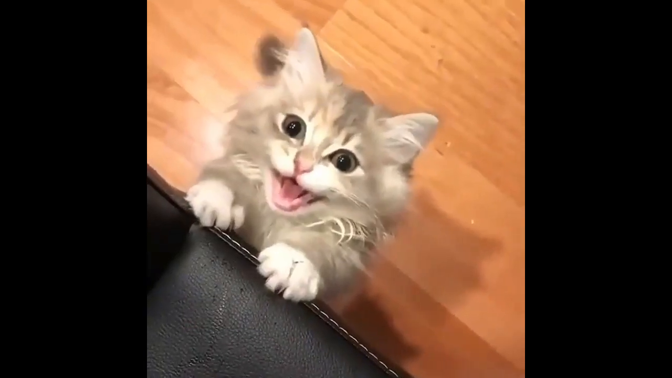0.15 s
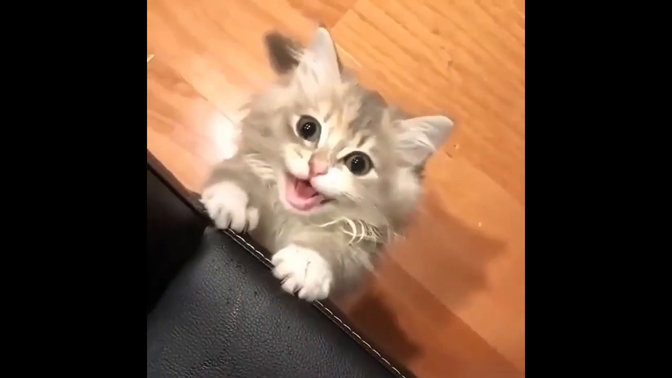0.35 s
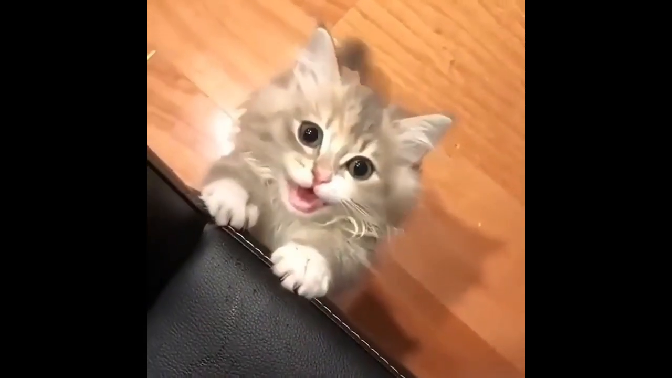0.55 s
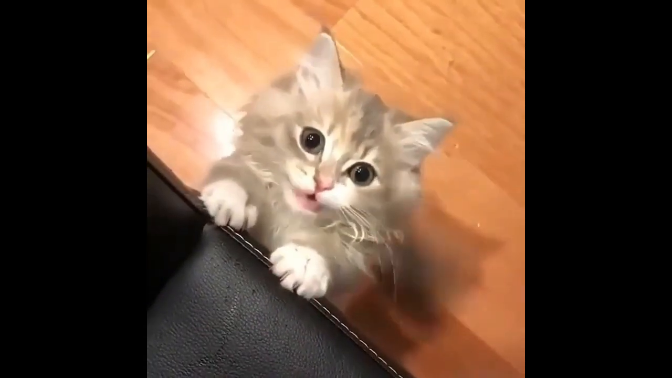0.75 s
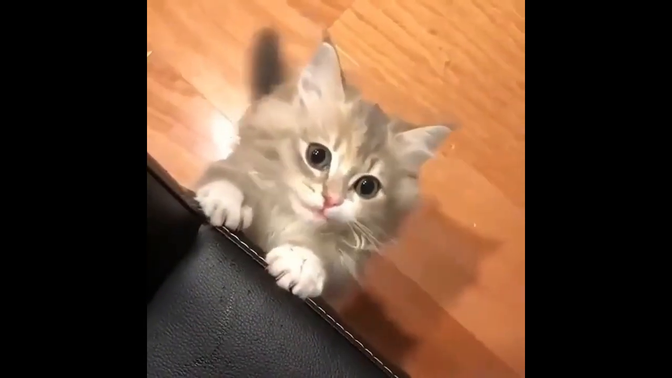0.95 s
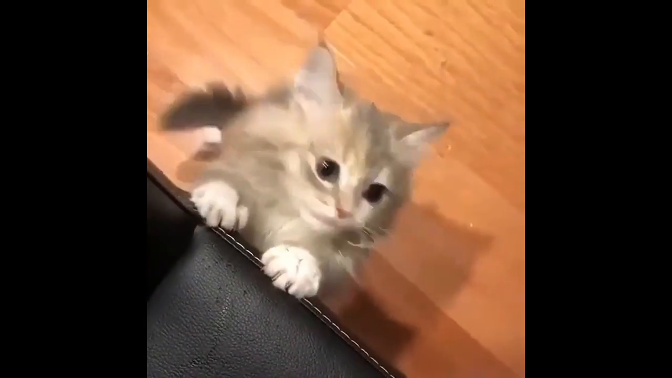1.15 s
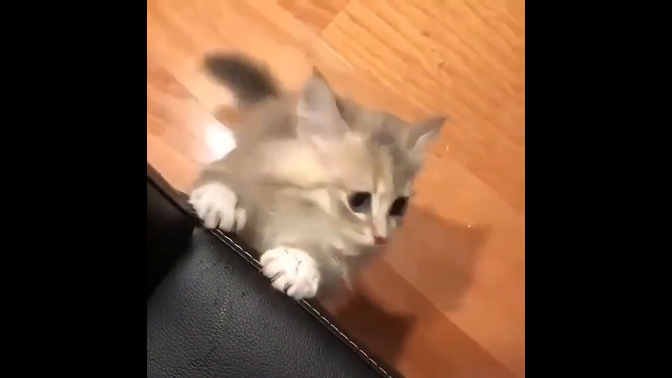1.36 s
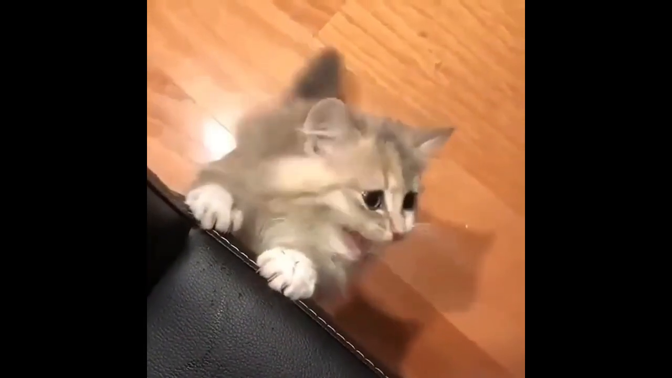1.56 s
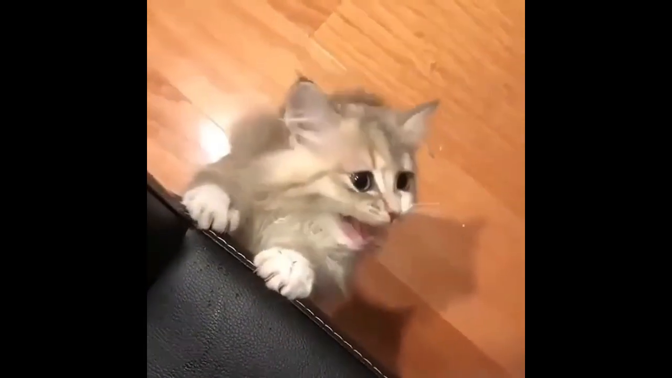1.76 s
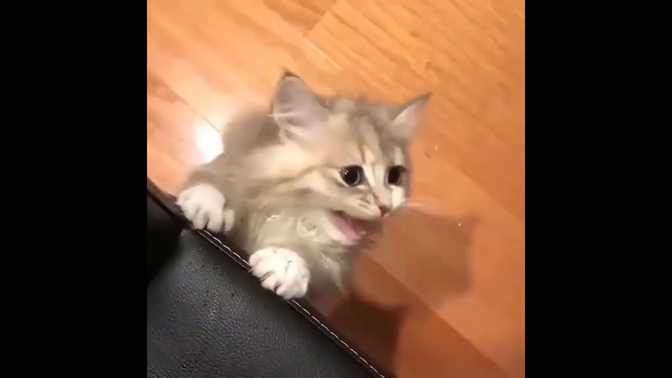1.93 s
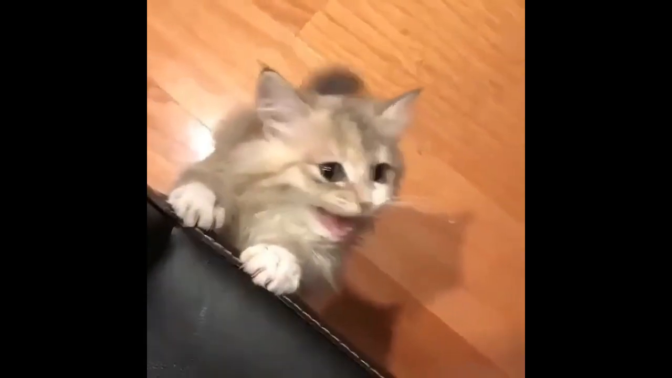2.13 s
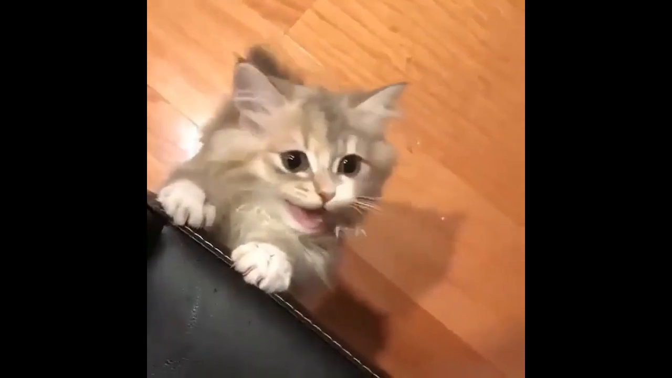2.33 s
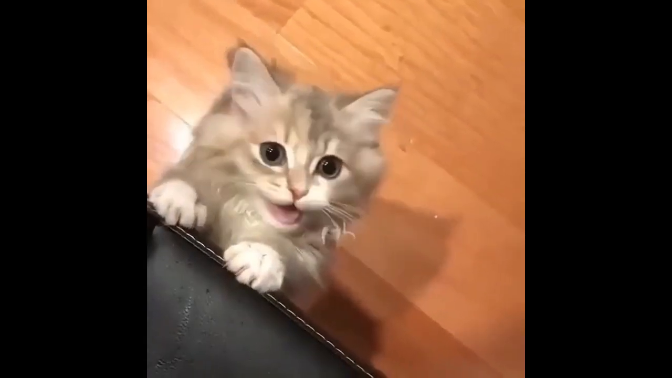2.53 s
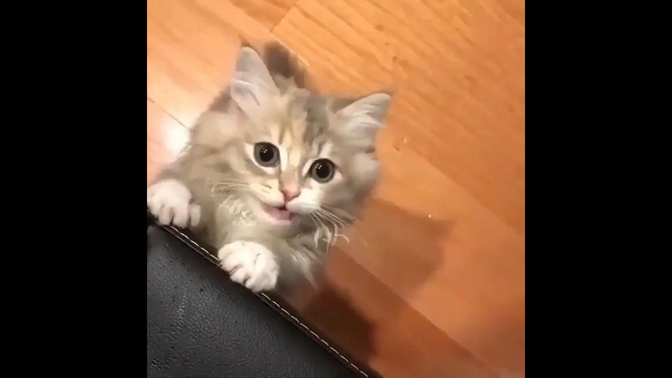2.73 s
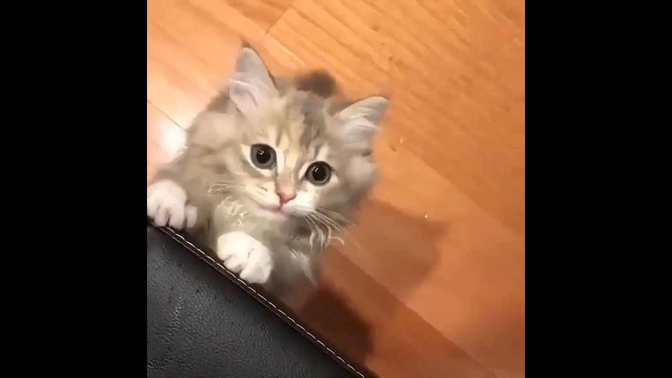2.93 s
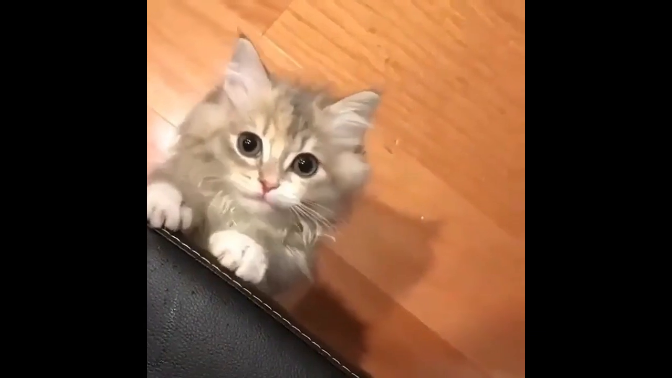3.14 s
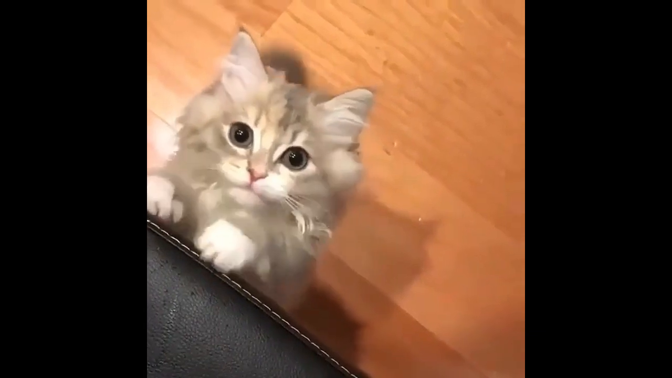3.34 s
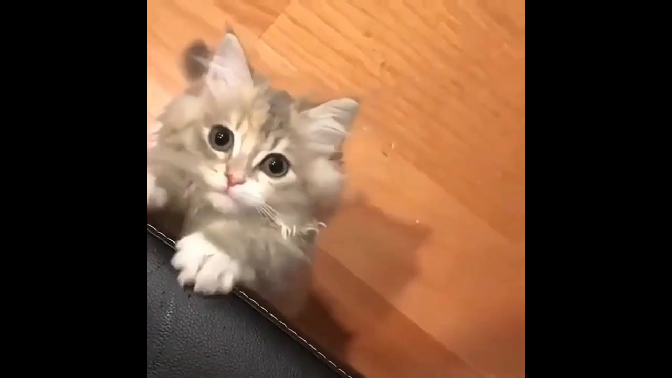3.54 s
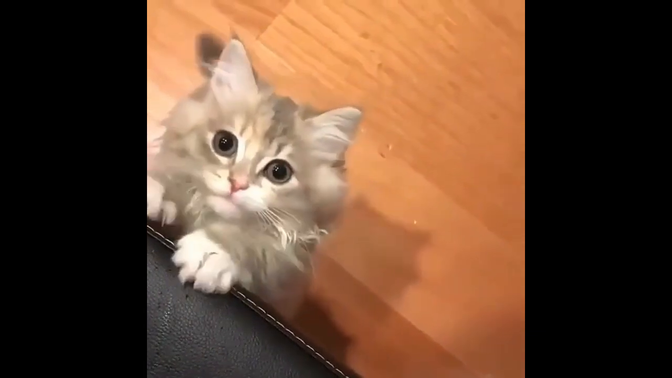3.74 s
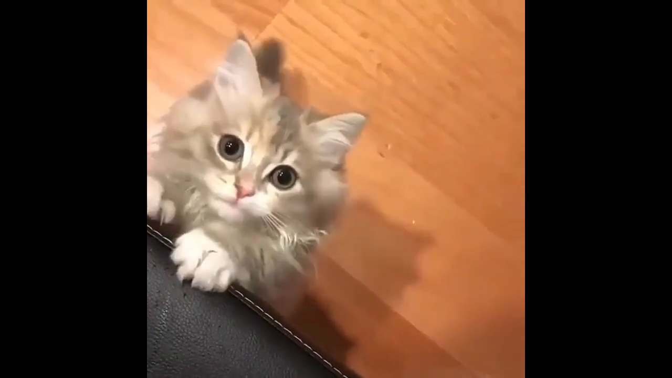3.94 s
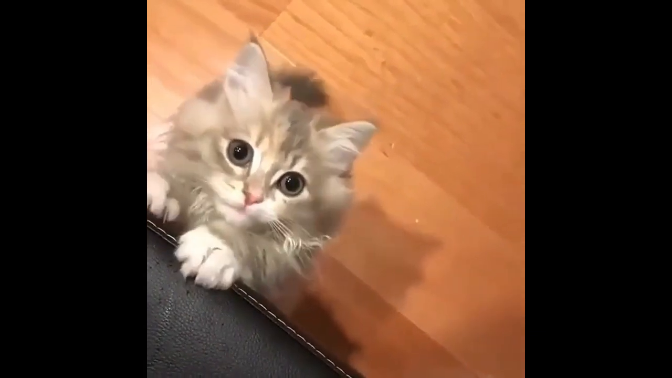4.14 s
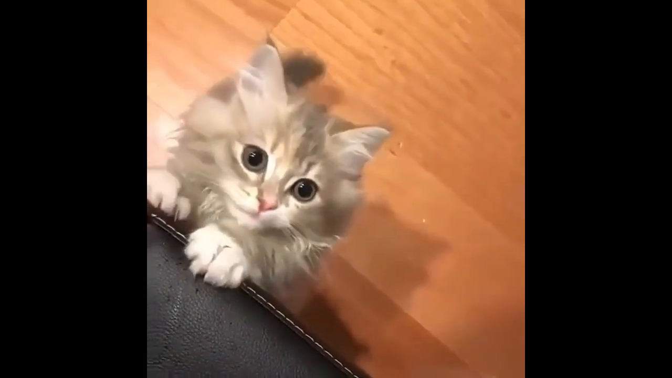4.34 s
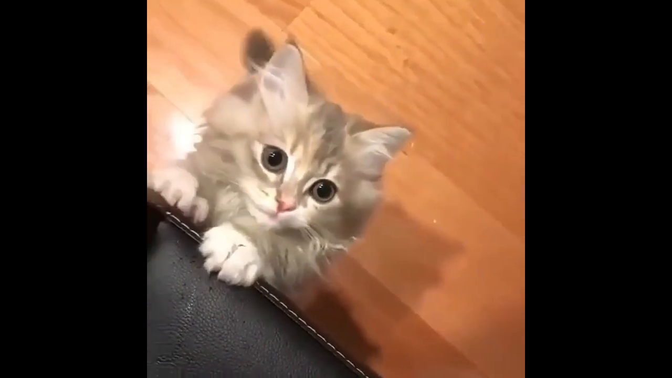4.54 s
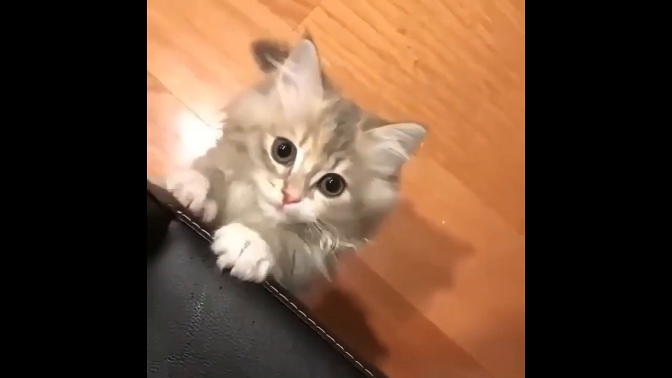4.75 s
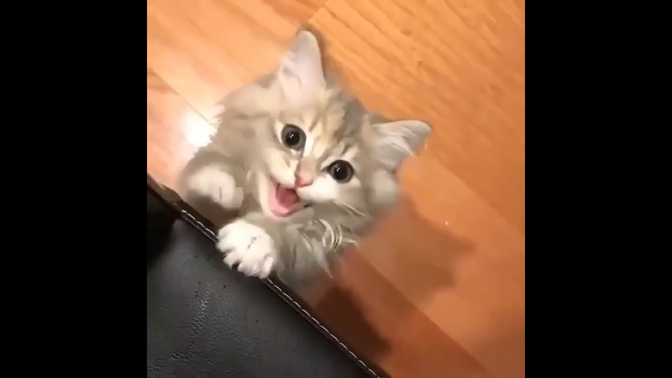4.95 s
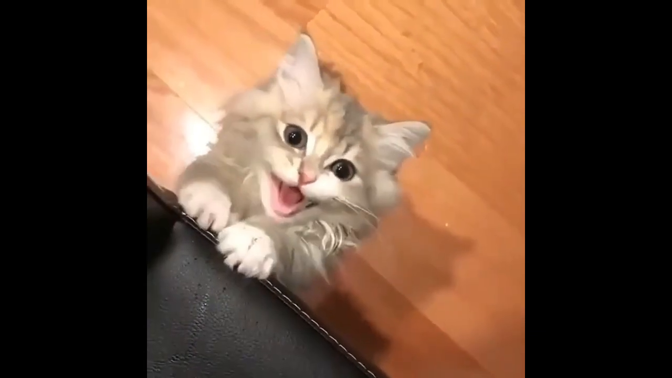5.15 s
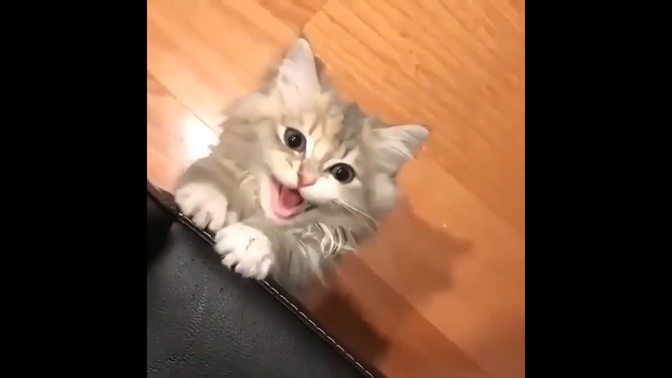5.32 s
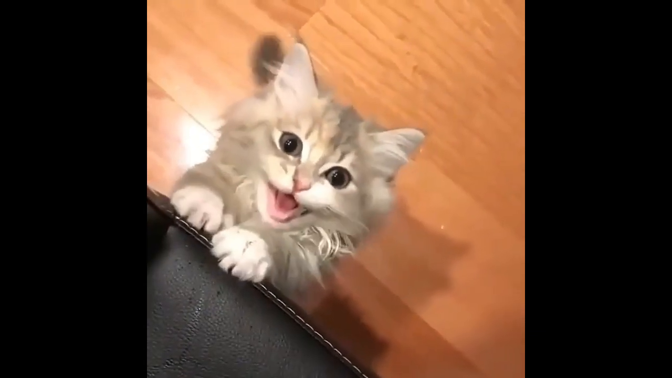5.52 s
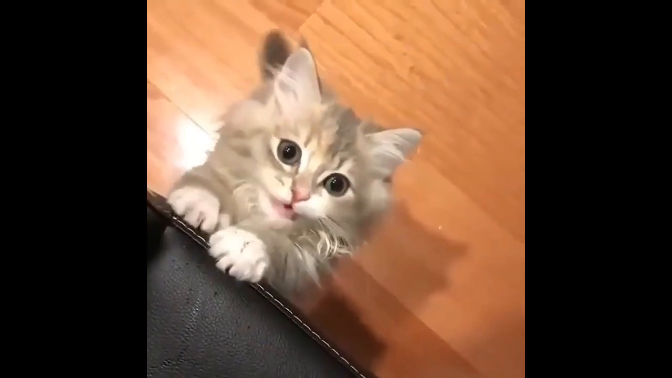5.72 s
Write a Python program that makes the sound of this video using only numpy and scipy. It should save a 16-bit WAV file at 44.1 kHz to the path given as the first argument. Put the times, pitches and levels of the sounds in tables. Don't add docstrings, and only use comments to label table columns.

```python
import sys
import numpy as np
from scipy import signal
from scipy.fft import rfft, irfft, next_fast_len
from scipy.io import wavfile
from scipy.ndimage import uniform_filter1d, minimum_filter1d

SR = 44100
rng = np.random.default_rng(int(sys.argv[2]) if len(sys.argv) > 2 else 0)


def nominal_scale(level):
    x = np.asarray(level, float) / 20
    return 10 ** x


def persist_wave(psi):
    counts = np.round(np.clip(psi, -1, 1) * 32767).astype(np.int16)
    wavfile.write(sys.argv[1], SR, np.atleast_2d(counts).T)


N = 259308

# t/s, f/Hz
MEW_PITCHES = [
    [(0.0, 807), (0.02, 798), (0.146, 783), (0.42, 763), (0.515, 737.3), (0.612, 676), (0.704, 703),
     (0.785, 715)],
    [(1.548, 789), (1.63, 763), (1.85, 768.7), (1.882, 787), (2.078, 792.3), (2.2, 775), (2.44, 761.3),
     (2.52, 745), (2.618, 678)],
    [(4.964, 818), (5.068, 734), (5.098, 733), (5.168, 751), (5.326, 780), (5.442, 788.4), (5.622, 771),
     (5.698, 748.5), (5.77, 674)],
]
# t/s, effort level/dB, mouth f/Hz, mouth focus above effort level/dB,
# nose facing the microphone level/dB
FIRST_MEW = [(0.0, -41.5, 3013, 12.5, -4.5), (0.32, -39, 3080, 0, -5.5), (0.524, -43, 2736, 8.5, -5.5),
             (0.552, -49.5, 2724, 17, -1), (0.582, -55, 2890, 14, -4), (0.622, -60, 2930, 22, 4),
             (0.68, -52, 2976, 22, -2), (0.734, -49.5, 2917, 17, -4.5), (0.785, -51.5, 2870, 5, -4.5)]
# t/s, effort level/dB, mouth f/Hz, mouth focus level/dB, nose facing level/dB
SECOND_MEW = [(1.509, -35.5, 3040, -28, -19.5), (1.65, -42, 2800, 4.5, -16), (1.8, -43, 3030, 8.5, -12),
              (2.106, -41, 3150, 3.5, -12), (2.16, -44.5, 3190, -2, -9), (2.42, -45.5, 2830, 6.5, -5.5),
              (2.522, -44.5, 2560, 11.5, -7), (2.58, -58.5, 2910, 4.5, -0.5), (2.773, -59, 2890, 10.5, 1.5)]
# t/s, effort level/dB, mouth f/Hz, mouth focus level/dB, nose facing level/dB
THIRD_MEW = [(4.928, -29.5, 3020, -5, -9), (5.01, -32, 3100, -7.5, -8), (5.11, -38, 2810, -5, -12.5),
             (5.184, -37.5, 3050, 5, -9), (5.292, -41.5, 3246, 16, -13), (5.306, -41.5, 3118, 8, -5.5),
             (5.64, -41, 2910, 7.5, -6), (5.688, -47.5, 2685, 16, -3.5), (5.77, -62.5, 1907, 20, 7)]
# start level/dB, end level/dB, second partial above it level/dB,
# third partial at start level/dB, at end level/dB
MEW_THROATS = [(-49, -50.5, -4.5, -1.5, -36.5), (-57, -48.5, -4, -20, -8.5), (-50.5, -51, -7.5, -5.5, -10)]
# breath against voice at start level/dB, at end level/dB,
# palate tilt per partial at start level/dB, at end level/dB
MEW_AIRFLOWS = [(-24, -35.5, -2, -3.4), (-26, -22.5, 1.2, -2.4), (-23, -21, -2, -2)]
# cheek level/dB, sinus level/dB, nose breath level/dB, pitch jitter/ratio
MEW_HEADS = [(-27, -10, 0, 0.0034), (1, -13.5, -5.5, 0.00263), (-34, -23, 1, 0.0039)]
# f/Hz, width/Hz
TRACT_MODES = [
    (760, 233),
    (3000, 395),
    (4156, 2350),
    (9110, 1960),
    (7010, 260),
    (13400, 2800),
]
# t/s, rise f/Hz, half width/s
FOLD_WOBBLES = [(0.173, 6.1, 0.087), (1.684, 12.9, 0.0209), (2.27, 12.2, 0.0346), (2.399, 8.2, 0.0405),
                (5.16, 4, 0.023)]
# t/s, depth level/dB, half width/s
VOICE_CATCHES = [(.575, 3, 0.0044), (1.545, 5.5, 0.0025), (1.863, 3, 0.004), (1.887, 8, 0.003),
                 (5.303, -0.5, 0.002), (5.316, 1, 0.0018), (5.330, 14, 0.0015), (5.349, 10, 0.00077),
                 (5.377, 6, 0.0026), (5.407, 1, 0.0031), (5.432, 2, 0.0015), (5.47, -4, 0.0017),
                 (5.505, 7, 0.0014), (5.554, 9, 0.0011)]
# t/s, length/s, depth/0-1
WEAK_PULSES = [(1.62, 0.13, 0.22), (4.966, 0.04, 0.07), (5.035, 0.099, 0.14), (5.36, 0.12, 0.14)]
# t/s, length/s, level/dB, slips per second/Hz, croak of the closing mouth level/dB
FOLD_RASPS = [(.764, .056, -51, 960, 1.5), (1.5, 0.045, -54, 1400, 0), (1.57, 0.17, -50, 1600, -25),
              (1.72, .2, -53, 1900, -22), (2.55, .07, -62, 1500, -20), (2.766, 0.04, -58, 630, 8),
              (4.926, 0.038, -44, 580, -15), (4.95, 0.11, -44.5, 1500., -21), (5.29, .45, -53, 1500, -25),
              (5.762, 0.037, -58.5, 1500, 6.5)]
# f/Hz, width/Hz, level/dB
BREATH_MODES = [(700, 1300, -16), (1590, 330, -6.5), (2980, 600, 6.5), (3810, 380, 1), (4480, 590, -1.5)]
# f/Hz, width/Hz, level/dB
NOSE_BREATH_MODES = [(9660, 3500, -4), (13200, 2100, -12.5)]
# f/Hz, width/Hz, share of power taken away/0-1
THINNER_BANDS = [(1950, 350, .9), (5750, 850, .8), (7800, 400, .7), (12250, 1900, .75)]
# (the thump fades by 60 dB
PAW_KNOCKS = [(0.391, -45, 405, -30, 0.039), (2.24, -39.5, 1110, -25, 0.011),
              (2.278, -37.5, 507, -30, 0.026), (2.45, -45, 192, -40, 0.081), (2.531, -49, 230, -40, 0.072),
              (2.822, -46.5, 228, -27, 0.035), (2.854, -53, 203, -36, 0.032),
              (2.963, -42.5, 324, -38, 0.029), (2.968, -46.5, 580, -12, 0.022),
              (3.385, -32.5, 370, -10, 0.026), (3.404, -42, 610, -19, 0.052),
              (3.419, -48.5, 450, -22, 0.093), (3.644, -46, 353, -17, 0.04), (3.662, -44, 260, -19, 0.029),
              (3.74, -38, 400, -23, 0.025), (3.746, -48, 536, -16, 0.061), (3.758, -44.5, 252, -33, 0.034),
              (4.771, -43.5, 460, -18, 0.037), (5.014, -31.5, 520, -31, 0.012)]
# delay t/s, level/dB
ROOM_ECHOES = [(.0021, -35), (.0047, -57), (.0083, -32), (0.0128, -16.5)]
# f/Hz, density level/dB
FAN_SPECTRUM = [(15, -63), (25, -15), (54, -9), (86, 2), (112, -3), (135, -12), (166, -1), (234, -9.5),
                (357, -7.5), (464, -28.5), (503, -12), (766, -16.5), (997, -15.5), (2780, -28.5),
                (13500, -43)]
# f/Hz, width/Hz, rms level/dB
APPLIANCE_HUMS = [(106.4, 14, -68.5), (169.84, 12, -66.5), (365.7, 8.2, -73)]
# t/s, mask rise level/dB
THIN_MOMENTS = [(1.14, 9), (3.36, 5.5), (3.635, 5), (3.722, 7), (3.766, 6.5), (4.79, 11), (4.916, -9),
                (5.28, 10), (5.48, 24), (5.8, -3)]


def kitten():
    tremor, shimmer = drift(55.6)[0], drift(20.3, count=7)
    air = rng.standard_normal(N) * nominal_scale(1.5 * drift(14)[0])
    hiss = np.array([windpipe(air, BREATH_MODES), windpipe(air, NOSE_BREATH_MODES)])
    scale = np.std(hiss[0])
    sound = fold_rasps() / scale
    mouths = (FIRST_MEW, SECOND_MEW, THIRD_MEW)
    for call in zip(MEW_PITCHES, mouths, MEW_THROATS, MEW_AIRFLOWS, MEW_HEADS):
        sound = sound + mew(*call, tremor, shimmer, hiss / scale)
    return thin_bands(sound)


def mew(tune, rows, throat, airflow, head, tremor, shimmer, hiss):
    s, *columns = np.transpose(rows)
    span = slice(round(s[0] * SR), min(round(s[-1] * SR), N))
    t = np.arange(N)[span] / SR
    slow = t[::32]
    begins = s[0] > 0

    def glide(ends):
        return np.interp(slow, s[[0, -1]], ends)

    effort_db, mouth_hz, focus_db, facing_db = [np.interp(slow, s, c) for c in columns]
    weak_db = begins * 4.5 * np.clip(1 - (slow - s[0]) / 0.023, 0, 1)
    palate_db = effort_db - weak_db
    mouth_db, nose_db = palate_db + focus_db, palate_db + facing_db

    narrow_db = begins * 10.5 * bell(slow, s[0] + 0.051, 0.027)
    palate_db = palate_db + 0.22 * narrow_db
    start_db, end_db, second_db, *third = throat
    second_db = second_db + narrow_db - 0.28 * np.maximum(focus_db, 0)
    third_db = glide(third) - 2 * narrow_db
    sag_s = 0.12
    closing = np.clip(1 - (s[-1] - slow) / sag_s, 0, 1) ** 2
    throat_db = glide([start_db, end_db]) - .5 * weak_db - 3.5 * closing
    breath_db, tilt_db = glide(airflow[:2]), glide(airflow[2:])

    scoop_hz = begins * 115.5 * np.clip(1 - (t - s[0]) / .042, 0, 1) ** 2
    sag_hz = 65.8 * np.clip(1 - (s[-1] - t) / sag_s, 0, 1) ** 2
    wobble_hz = sum(hz * bell(t, at, width) for at, hz, width in FOLD_WOBBLES)
    pitch = np.interp(t, *np.transpose(tune)) - scoop_hz - sag_hz + wobble_hz
    pitch = uniform_filter1d(pitch, size=400)
    cheek_db, sinus_db, nose_breath_db, jitter = head
    catch_db = sum(db * bell(t, at, width) for at, db, width in VOICE_CATCHES)
    bend = 1 + jitter * tremor[span] - .001 * catch_db
    phase = 2 * np.pi * np.cumsum(pitch * bend) / SR

    (_, throat_w), (_, mouth_w), (palate_hz, palate_w), nose, cheek, sinus = TRACT_MODES
    low, voice = pitch[::32], 0
    palate_top = hump(5 * low, palate_hz, palate_w, steep=2.26)
    for k in range(1, 22):
        hz = k * low
        if k < 4:
            power = nominal_scale(2 * (throat_db + (0, second_db, third_db)[k - 1]))
        else:
            power = nominal_scale(2 * throat_db) * hump(hz, low, throat_w, steep=3.8)
        power = power + nominal_scale(2 * mouth_db) * hump(hz, mouth_hz, mouth_w)
        if k > 3:
            tilted_db = palate_db - 5.5 + (tilt_db - 0.5) * np.clip(k - 5, 0, 3)
            power = power + nominal_scale(2 * tilted_db) * hump(hz, palate_hz, palate_w, steep=3.04) / palate_top
        upper = hump(hz, *nose) + nominal_scale(2 * cheek_db) * hump(hz, *cheek) + nominal_scale(2 * sinus_db) * hump(hz, *sinus)
        power = power + nominal_scale(2 * (nose_db - 9.0)) * upper
        modes = (mouth_hz, mouth_w), (palate_hz, palate_w), nose
        lag = sum(np.arctan(2 * (hz - f) / w) for f, w in modes)
        unsteady_db = .35 if k in (1, 4) else 3.2 if k > 6 else 1.8 if k < 4 else .8
        height = np.sqrt(2 * power) * nominal_scale(unsteady_db * shimmer[k % len(shimmer), span][::32])
        partial = np.interp(t, slow, height) * np.cos(k * phase - np.interp(t, slow, lag))
        voice = voice + partial * (nominal_scale(-catch_db) if k > 2 else 1)

    halves = sum(depth * swell(t, at, length) for at, length, depth in WEAK_PULSES)
    voice = voice * (1 + halves * np.cos(phase / 2))
    loud = np.interp(t, slow, np.sqrt(nominal_scale(2 * mouth_db) + nominal_scale(2 * palate_db)) * nominal_scale(breath_db))
    breath = hiss[0][span] + nominal_scale(nose_breath_db) * hiss[1][span]
    voice = voice + loud * nominal_scale(1.1 * catch_db) * breath
    fade_in = np.clip((t - s[0]) / 0.00097, 0, 1) if begins else 1
    out = np.zeros(N)
    out[span] = voice * fade_in * np.clip((s[-1] - t) / 0.0011, 0, 1)
    return out


def fold_rasps():
    t, chance = np.arange(N) / SR, rng.random(N)
    sizes, rush = nominal_scale(2 * rng.standard_normal(N)), rng.standard_normal(N)
    rasp, croak = np.zeros(N), np.zeros(N)
    for s, length, db, per_s, croak_db in FOLD_RASPS:
        slips = (chance < per_s / SR) * sizes * np.sqrt(SR / per_s)
        envelope = swell(t, s, length) ** .5 * np.exp(-(t - s) / length * (t > s))
        burst = nominal_scale(db) * envelope * (1.08 * slips + 0.55 * rush)
        rasp, croak = rasp + burst, croak + nominal_scale(croak_db) * burst
    turns = np.transpose(FIRST_MEW + SECOND_MEW + THIRD_MEW)
    facing = nominal_scale(np.minimum(np.interp(t, turns[0], turns[-1]) - 5, 0))
    through_nose = windpipe(facing * rasp, NOSE_BREATH_MODES)
    return windpipe(rasp, BREATH_MODES) - through_nose + resonate(croak, 620, 950)


def windpipe(x, modes):
    out = 0
    for k, (hz, width, db) in enumerate(modes):
        w = 0.82 * width
        out = out + nominal_scale(db) * (-1) ** k * resonate(resonate(x, hz, w), hz, w)
    return out


def thin_bands(x):
    size = next_fast_len(N)
    hz, spectrum = np.fft.rfftfreq(size, 1 / SR), rfft(x, size)
    for centre, width, share in THINNER_BANDS:
        spectrum = spectrum * np.sqrt(1 - np.clip(share, 0, .995) * hump(hz, centre, width))
    return irfft(spectrum, size)[:N]


def hump(hz, centre, width, steep=2.23):
    return (1 + (2 * (hz - centre) / width) ** 2) ** -steep


def bell(t, at, width):
    return np.exp(-((t - at) / width) ** 2)


def swell(t, s, length):
    return np.sin(np.pi * np.clip((t - s) / length, 0, 1))


def drift(rate, count=1):
    r = np.exp(-2 * np.pi * rate / SR)
    white = rng.standard_normal((count, N + 9000))
    slow = signal.lfilter([1], [1, -2 * r, r * r], white)[:, 9000:]
    return slow / slow.std(axis=1, keepdims=True)


def resonate(x, hz, width):
    r = np.exp(-np.pi * width / SR)
    zeros = (1 - r * r) / 2 * np.array([1, 0, -1])
    return signal.lfilter(zeros, [1, -2 * r * np.cos(2 * np.pi * hz / SR), r * r], x + 1e-18)


def rms_one(x):
    return x / np.sqrt(np.mean(x ** 2) + 1e-20)


def paws():
    out, t = np.zeros(N), np.arange(int(.15 * SR)) / SR
    grain = rng.standard_normal((len(PAW_KNOCKS), 2, len(t)))
    dull = signal.butter(2, [200, 1400], "band", fs=SR, output="sos")
    late = np.maximum(t - .0012, 0)
    for (s, db, hz, claw_db, t60), (tick, rustle) in zip(PAW_KNOCKS, grain):
        thump = -np.sin(2 * np.pi * hz * late) * nominal_scale(-60 * late / (.5 * t60)) * (1 - np.exp(-late / 0.00044))
        rustle = 0.26 * rms_one(signal.sosfilt(dull, rustle)) * nominal_scale(-60 * t / (3.2 * t60))
        soft = .55 if claw_db > -17 else .8
        tick = rms_one(signal.lfilter([1], [1, -soft], tick))
        tick_fade = nominal_scale(-60 * np.abs(t - .001) / 0.0012) + 0.056 * nominal_scale(-60 * t / 0.13)
        claw = nominal_scale(claw_db) * tick * tick_fade
        i = round((s - .001) * SR)
        out[i:i + len(t)] += (nominal_scale(db) * (2.4 * thump + rustle + 4 * claw))[:N - i]
    return out


def room(x):
    t60_s, tail_db = .2, -26
    t = np.arange(int(.3 * SR)) / SR
    tail = signal.lfilter([.5], [1, -.5], rng.standard_normal(len(t))) * nominal_scale(-60 * t / t60_s) * (t > .012)
    response = nominal_scale(tail_db) * tail / np.sqrt(np.sum(tail ** 2))
    response[0] = 1
    for delay, db in ROOM_ECHOES:
        response[round(delay * SR)] += nominal_scale(db)
    return signal.fftconvolve(x, response)[:N]


def room_air():
    white, edges = rng.standard_normal((2, N)), 22 * 2 ** np.arange(0, 9.5, 1 / 3)
    flicker, points, fan = drift(3.9, count=5), np.array(FAN_SPECTRUM), 0
    for k, (low, high) in enumerate(zip(edges, edges[1:])):
        level_db = np.interp(np.log(low * high) / 2, np.log(points[:, 0]), points[:, 1])
        band_pass = signal.butter(2, [low, high], "band", fs=SR, output="sos")
        flicker_db = (2.5 if low < 70 else 1.2) * flicker[k % 5]
        fan = fan + nominal_scale(level_db + flicker_db) * signal.sosfilt(band_pass, white[k % 2])
    hums = 0
    for hz, width, db in APPLIANCE_HUMS:
        hums = hums + nominal_scale(db) * rms_one(resonate(resonate(white[0][::-1], hz, width), hz, width))
    return nominal_scale(-58.5) * rms_one(fan) + hums


def scene():
    return np.tile(room(kitten() + paws()) + room_air(), (2, 1))


def thin_out(x):
    near_db, wide_db, floor_db, sway_db = -28.5, -50, -3.5, 5.0
    hz, t, z = signal.stft(x, SR, nperseg=1536, noverlap=1152)
    power = uniform_filter1d(np.abs(z) ** 2, size=7, axis=0)
    near = -minimum_filter1d(-power, size=39, axis=0, origin=9)
    around = uniform_filter1d(power, size=61, axis=0) * (hz[:, None] > 2500)
    sway = uniform_filter1d(rng.standard_normal(z.shape), size=19, axis=0)
    sway = uniform_filter1d(sway, size=9, axis=1)
    moments_db = sum(db * (np.abs(t - at) < .012) for at, db in THIN_MOMENTS)
    rise_db = sway_db * rms_one(sway) + moments_db
    deaf_db = 12 * ((hz > 11800) & (hz < 12800))[:, None]
    mask = np.maximum(near * nominal_scale(2 * near_db), power.max(axis=0) * nominal_scale(2 * (wide_db + deaf_db)))
    mask = np.maximum(mask, np.minimum(around * nominal_scale(2 * floor_db), 1e-11))
    kept = np.clip(2 * power / (mask * nominal_scale(2 * rise_db)) - 1, .02, 1)
    kept[hz > 14040] = 0
    return signal.istft(z * kept, SR, nperseg=1536, noverlap=1152)[1][:N]


def roll_off(x):
    return signal.sosfilt(signal.butter(12, 14060, fs=SR, output="sos"), x)


def record(dry):
    mix = np.tile(thin_out(dry[0]), (2, 1))
    return roll_off(mix)


dry = scene()
out = record(dry)
persist_wave(out)
```